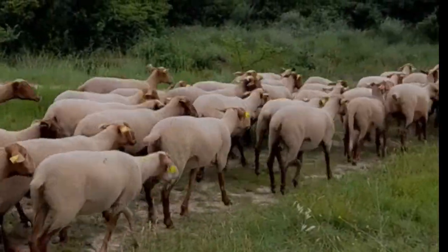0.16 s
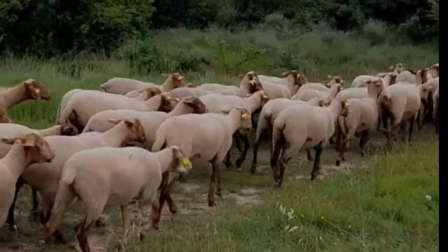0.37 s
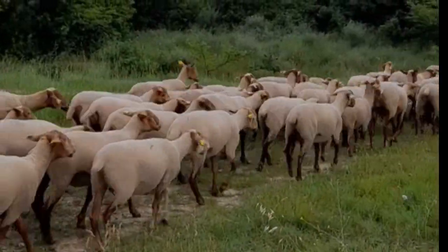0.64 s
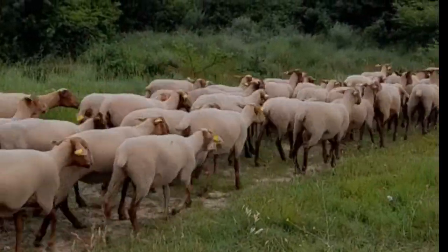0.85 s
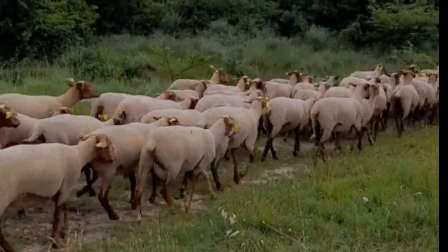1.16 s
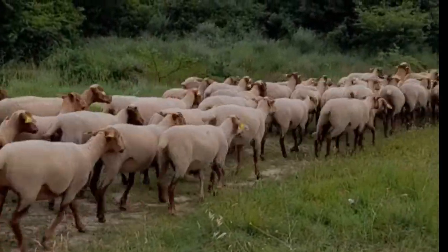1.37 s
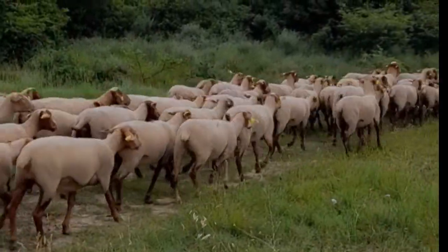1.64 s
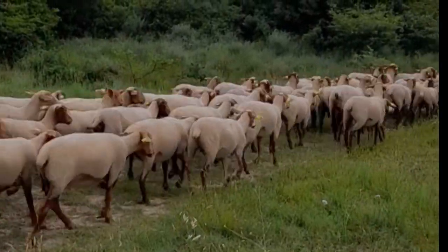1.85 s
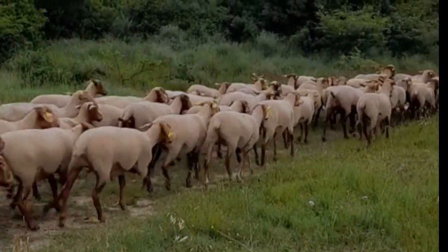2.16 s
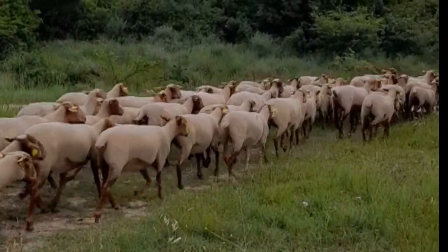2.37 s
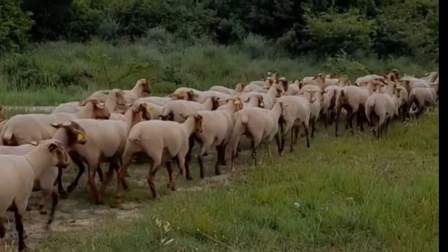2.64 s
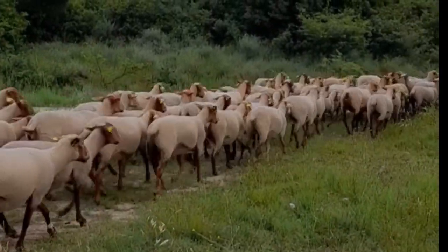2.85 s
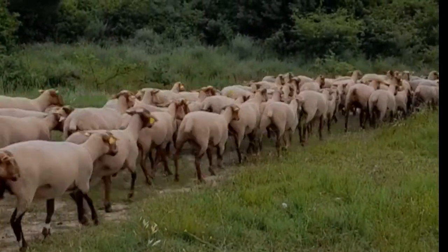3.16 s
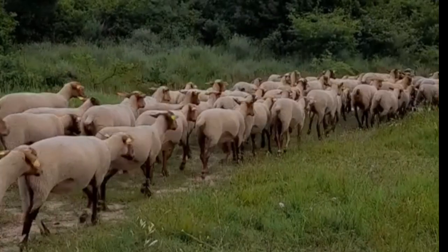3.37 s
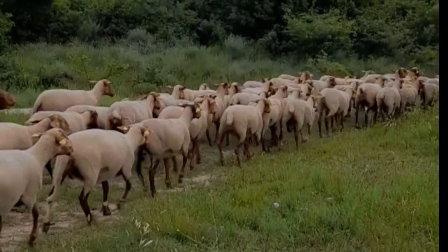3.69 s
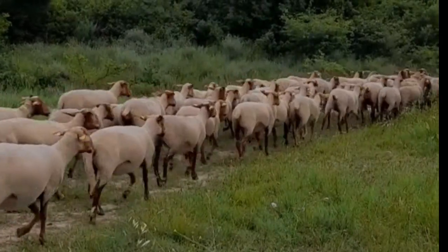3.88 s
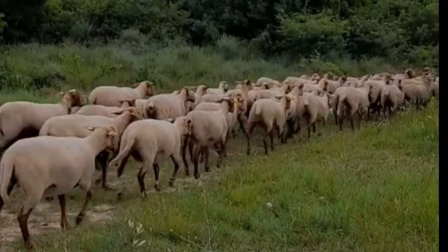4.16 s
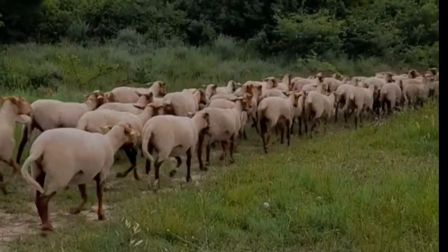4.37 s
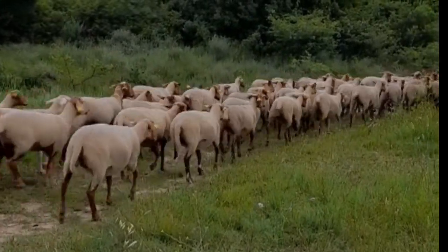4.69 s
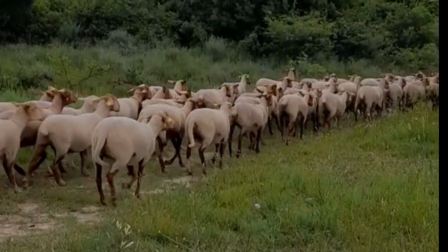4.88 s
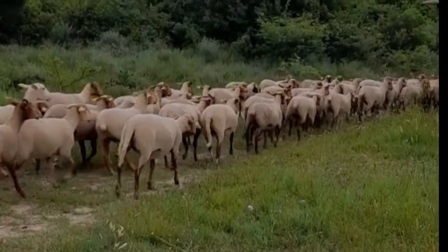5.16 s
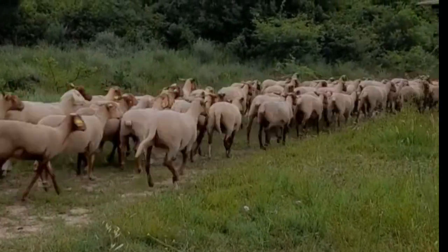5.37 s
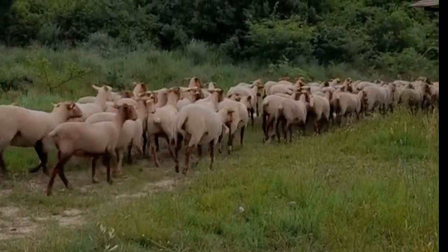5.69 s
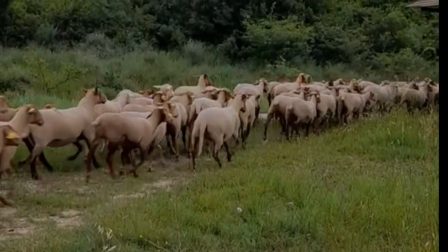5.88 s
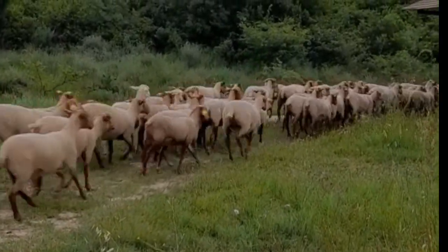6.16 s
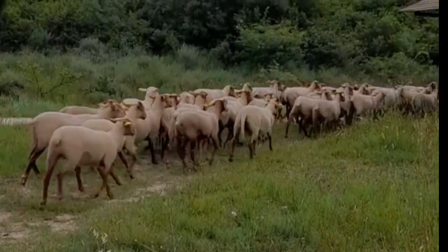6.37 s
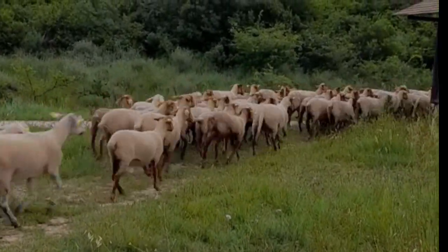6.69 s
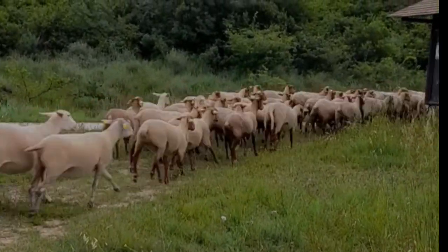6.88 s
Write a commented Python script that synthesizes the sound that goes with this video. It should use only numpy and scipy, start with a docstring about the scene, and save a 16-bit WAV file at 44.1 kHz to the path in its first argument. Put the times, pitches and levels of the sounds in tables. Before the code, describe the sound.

A flock of sheep tramples past on dry dirt and grass, hooves drumming and swishing, while a small tinny bell clanks irregularly and a bird trills faintly.

```python
"""A flock of sheep walks past on a dry dirt track between grass, its hooves drumming, scuffing and swishing
throughout as noise-filtered contacts. From 0.1 s a small sheet-metal bell clanks: decaying modes, struck by
a clapper; it nears, passes at about 3 s and leaves. Single hooves thud as damped sines and dry stalks snap
as noise bursts. From 0.9 s a bird trills in the hedge now and then, a swept sine.
The near drumming and the rustle are strongest after 5 s."""
import sys
import numpy as np
from scipy import signal
from scipy.fft import rfft, irfft, next_fast_len
from scipy.io import wavfile
from scipy.ndimage import map_coordinates

SR = 44100
rng = np.random.default_rng(int(sys.argv[2]) if len(sys.argv) > 2 else 0)


def to_wav(sig):
    """Store sig (one row per channel, or 1-D mono) as 16-bit WAV at the path in sys.argv[1].

    Samples outside -1..1 are clipped; the rate is SR.
    """
    pcm = np.clip(np.atleast_2d(sig), -1, 1) * 32767
    pcm = np.round(pcm).astype(np.int16)
    wavfile.write(sys.argv[1], SR, pcm.T)  # frames by channels


N = 310023


def amp(db):
    """dB to gain."""
    return 10 ** (np.asarray(db) / 20)


def unit(x):
    """Scaled to rms 1."""
    return x / np.sqrt(np.mean(x ** 2) + 1e-20)


def along(points, hz):
    """Interpolates (frequency [Hz], value) points on a log-frequency axis."""
    f, v = np.transpose(points)
    return np.interp(np.log(hz + 1), np.log(f + 1), v)


def wobble(knots_per_s):
    """A smooth random curve through normal knots."""
    knots = rng.standard_normal(int(N * knots_per_s / SR) + 4)
    return map_coordinates(knots, [np.arange(N) * knots_per_s / SR])


def filtered(x, response):
    """x times a response of frequency [Hz]."""
    m = next_fast_len(N + 8192)
    return irfft(rfft(x, m) * response(np.fft.rfftfreq(m, 1 / SR)), m)[..., :N]


def add(out, start_s, sound):
    """Mixes a sound into both channels from start_s."""
    part = out[:, round(start_s * SR):][:, :sound.shape[-1]]
    part += sound[..., :part.shape[1]]


# bird trills: (start [s], length [s], level [dB], lowest and highest pitch before droop and waver [Hz])
TRILLS = [(0.887, 0.14, -58, 3970, 5400), (2.328, 0.115, -53, 3940, 5030), (3.432, 0.15, -52, 3590, 4980),
          (5.033, 0.14, -50.5, 3480, 4770), (6.137, 0.17, -52.5, 3620, 4860),
          (6.829, 0.18, -55.5, 3590, 4830)]


def bird():
    """A thin whistle arches up and down 81 times a second, unevenly; the hedge blurs it."""
    out, uneven, waver = np.zeros((2, N)), wobble(70), wobble(60)
    for start_s, length_s, db, low_hz, high_hz in TRILLS:
        t = np.arange(round(length_s * SR)) / SR
        first = round(start_s * SR)
        here = slice(first, first + len(t))
        arch = np.sin(np.pi * 81 * t) ** 2
        loudness = (.2 + arch) * amp(3 * uneven[here])
        droop = 1 - 0.07 * (t / length_s) ** 3
        pitch_hz = (low_hz + (high_hz - low_hz) * arch) * droop * (1 + 0.02 * waver[here])
        fade = np.clip(t / 0.014, 0, 1) * np.clip((length_s - t) / 0.0051, 0, 1)
        whistle = np.sin(2 * np.pi * np.cumsum(pitch_hz) / SR)
        add(out, start_s, amp(db) * fade * loudness * whistle)
    t = np.arange(SR // 8) / SR
    leaves = rng.standard_normal((2, len(t))) * amp(-60 * t / .14)
    leaves /= np.linalg.norm(leaves[0])
    return out + 0.65 * signal.fftconvolve(out, leaves, axes=1)[:, :N]


# likeness of left and right in the trampling: (frequency [Hz], correlation [-1 to 1])
ALIKE = [(130, 1), (290, 0.98), (640, 0.88), (1400, 1), (3100, 0.41), (15000, -0.031)]


def trample(spectrum, contacts_per_s, spread_db, noise_rms):
    """Stereo rms 1: contacts of very unequal size over smooth noise, shaped by a spectrum."""
    chance, size = rng.random((2, 2, N))
    size_db = -spread_db * np.log(1 - size + .02)
    contacts = (chance < contacts_per_s / SR) * amp(size_db) * rng.standard_normal((2, N))
    pair = unit(contacts) + noise_rms * rng.standard_normal((2, N))
    low_end = [(1, -120), (spectrum[0][0] / 2, -90)]
    closed = low_end + list(spectrum) + [(spectrum[-1][0] * 2, -90)]

    def mid_side(hz):
        turn = np.arccos(np.clip(along(ALIKE, hz), -1, 1)) / 2
        return amp(along(closed, hz)) * [np.cos(turn), np.sin(turn)]

    mid, side = filtered(pair, mid_side)
    return unit(np.array([mid + side, mid - side]))


# spectra of the flock's layers: (frequency [Hz], relative density [dB per Hz])
DEEP_SPECTRUM = [(22, -38), (33, -14), (54, -1), (81, -7), (124, 3), (150, -6.5), (200, -16)]
NEAR_SPECTRUM = [(110, -46), (150, 1.5), (190, -1), (240, -4), (310, -32)]
HARD_SPECTRUM = [(190, -23), (250, -1.5), (300, -4), (400, -14.5), (550, -36)]
SCUFF_SPECTRUM = [(250, -34), (420, -1), (800, 1), (1100, -1.5), (1600, -7.5), (2400, -14.5), (4000, -6)]
GRASS_SPECTRUM = [(1500, -8), (2500, -7.5), (4000, -4), (6500, 0), (8500, -5), (9800, 1.5), (11600, -2),
                  (14000, 2.5), (15800, -5.5)]
# flock controls, used as deviations from their means:
# (time [s], deep drumming [dB], near drumming [dB], rustle [dB])
FLOCK = [(0.0, -50, -48.5, -61.5), (0.21, -53, -57, -60.5), (0.45, -51, -55.5, -65.5),
         (0.96, -54.5, -55.5, -64), (1.21, -54.5, -53.5, -61.5), (1.66, -53.5, -57, -61),
         (2.06, -54.5, -54.5, -61), (2.56, -51, -53.5, -60.5), (2.64, -50.5, -55, -58.5),
         (3.37, -51.5, -53, -58.5), (3.74, -52.5, -49, -59), (4.01, -50, -50.5, -58),
         (5.4, -50.5, -48, -55), (5.7, -50, -46, -52.5), (6.32, -49, -43, -56.5), (6.62, -54, -44, -55),
         (6.83, -50, -47, -59), (7.03, -51, -45, -59.5)]
# animals passing close in a bunch: (middle [s], half length [s],
# swell of drumming [dB], of knocks on hard soil [dB], of rustle [dB])
BUNCHES = [(0.17, 0.093, 14.5, 3, -3), (0.646, 0.055, 3, 2.5, 4), (1.975, 0.056, 3, 7, 2),
           (2.784, 0.023, 5.5, 1.5, -1), (3.008, 0.041, 5.5, 2.1, 7), (4.06, .06, 4, 3, 0),
           (4.27, 0.088, 0, 4, -2), (4.496, .05, 4, 4.3, -1.5), (4.72, 0.019, 1.5, 4.4, 3),
           (5.515, 0.045, -3, 9.3, -1.5), (5.943, 0.082, 1, 6.6, 2), (6.464, 0.03, 10, 6.3, 3.5),
           (6.768, 0.1, 6, 6, 4.5), (6.97, 0.022, 2, 6.6, 2)]


def flock():
    """Many hoof contacts blur into drumming, knocks, scuffing and swish; close bunches change their levels."""
    time_s, *columns = np.transpose(FLOCK)
    t = np.arange(N) / SR
    deep_db, drum_db, rustle_db = [np.interp(t, time_s, c) - np.mean(c) for c in columns]
    close_db, knock_db, brush_db = sum(
        np.outer(swell_db, np.exp(-((t - middle_s) / half_s) ** 2))
        for middle_s, half_s, *swell_db in BUNCHES)
    steps = wobble(9)  # shared by scuff and grass

    # each level: mean dB + slope * control
    deep_level = -49 + 1.26 * deep_db + 1.4 * wobble(6.17) + 0.41 * wobble(49)
    near_level = -52.5 + 0.71 * drum_db + close_db + 1.33 * wobble(10)
    hard_level = -58.5 + 1.04 * drum_db + knock_db + 0.98 * wobble(14)
    scuff_level = -58 + 0.55 * rustle_db + 0.21 * knock_db + 0.55 * brush_db + 0.64 * steps
    grass_level = -53.5 + 1.03 * rustle_db + brush_db + 1.9 * steps + 2.13 * wobble(30)

    deep = amp(deep_level) * trample(DEEP_SPECTRUM, 300, spread_db=1.5, noise_rms=1.4)
    near = amp(near_level) * trample(NEAR_SPECTRUM, 150, spread_db=2.5, noise_rms=1.45)
    hard = amp(hard_level) * trample(HARD_SPECTRUM, 150, spread_db=2.5, noise_rms=0.92)
    scuff = amp(scuff_level) * trample(SCUFF_SPECTRUM, 500, spread_db=4.0, noise_rms=1.58)
    grass = amp(grass_level) * trample(GRASS_SPECTRUM, 1500, spread_db=1.5, noise_rms=1.57)
    return deep + near + hard + scuff + grass


# single near hoof falls, each starting 3 ms before its time: (time [s], level [dB], pitch [Hz])
THUDS = [(0.066, -37, 173), (0.311, -47, 119), (0.884, -42.5, 123), (1.097, -45, 129), (1.347, -45, 150),
         (1.412, -39.5, 127), (1.609, -44, 125.8), (1.718, -40, 120), (1.819, -42, 126), (1.857, -42, 131),
         (1.958, -37.5, 145), (2.124, -42, 123), (2.575, -40, 127), (2.736, -48, 121), (2.943, -44.5, 125),
         (3.281, -40, 147), (3.502, -44, 95), (3.81, -41, 132), (3.883, -38, 138.5), (4.392, -49, 96),
         (4.696, -41, 122), (5.162, -34.5, 119), (5.454, -41, 135), (5.512, -36, 212), (5.92, -34, 257),
         (6.131, -36, 142), (6.389, -33.5, 282), (6.468, -38, 250), (6.554, -40, 133), (6.721, -35, 136),
         (6.952, -31.5, 187)]


def thuds():
    """A hoof pushes the soil once; it swings back for a cycle or two."""
    out, t = np.zeros((2, N)), np.arange(SR // 20) / SR
    for time_s, db, hz in THUDS:
        rise_s = 0.89 / hz
        envelope = (t / rise_s) * np.exp(1 - t / rise_s)
        add(out, time_s - .003, amp(db) * envelope * np.sin(2 * np.pi * hz * t))
    return out


# snapping stalks and pebbles: (time [s], level before filtering [dB],
# dull body relative to the crack, before filtering [dB], left-right [dB])
SNAPS = [(0.3383, -24, -28, -4), (1.1822, -47, -19, -2.5), (1.6906, -35, -21, -1.0),
         (1.8402, -43.5, 15.5, -4.5), (1.9854, -45, -23, -2.0), (2.0153, -49, -19, -1.5),
         (2.056, -21, -24, -1.5), (3.01, -21, -24, -1.0), (3.1188, -48, -20, 5), (3.3797, -44, -24, -0.5),
         (3.7244, -44, -22, -1.5), (3.7474, -19, -27, -0.5), (3.8591, -53, -11, -2),
         (4.0138, -41, -23, -1.0), (4.1234, -51, -16, -2.5), (4.142, -46, -22, -7),
         (4.6254, -27, -20, -2.0), (4.8788, -39, -21, -4), (5.0669, -46, -17, -1.5),
         (5.2777, -18, -13.5, -1.5), (5.4096, -44, -22, -5), (5.4605, -41, -21, -1.5),
         (5.7748, -44, -22, -2.0), (5.9004, -36, -15, -2.0), (5.9422, -16.5, -22, -16),
         (5.9468, -22, -29, -3), (5.9735, -27, -12, -1.5), (6.4526, -22, -21, 14), (6.5655, -41, -19, -1.5),
         (6.663, -27, -20, -2.0)]


def snaps():
    """A crack of about a millisecond, with a duller body and a short scatter of dust."""
    bright, dull, t = np.zeros((2, N)), np.zeros((2, N)), np.arange(SR // 30) / SR
    shape = amp(-60 * t / .004) + .12 * amp(-60 * t / .03)  # crack + dust
    for time_s, db, dull_db, pan_db in SNAPS:
        shared, own = rng.standard_normal(len(t)), rng.standard_normal((2, len(t)))
        crack = shape * (shared + .5 * own)
        side_db = db + np.array([[pan_db], [-pan_db]]) / 2
        crack = amp(side_db) * crack / np.abs(crack).max()
        add(bright, time_s, crack)
        add(dull, time_s, amp(dull_db) * crack)
    treble = lambda hz: (1j * hz / (5000 + 1j * hz)) ** 4
    body = lambda hz: 1j * hz * 3000 / (2500 ** 2 - hz * hz + 1j * hz * 3000)
    return filtered(bright, treble) + filtered(dull, body)


# places round the wall where the clapper lands:
# (response of each of the eight shell modes [dB] x 8, push on each of the five patches [dB] x 5)
PLACES = [(-14, -13, -30.0, -17.5, -13, -3.5, -8, -5, -37.0, -11, -23.0, 3.5, -17),
          (-15.5, -34, -49, -12, -34, -10, -18, -4.5, -1.5, -51, -37.0, -19, -20),
          (-7.5, -25, -11, -6.5, -18, -10, -6, -3, -32, -1.0, -23, -40.0, -8),
          (-4.0, -17, -19, -31, -5.5, -2, 4, 1.5, -18.0, -38, -8.5, -13, -44),
          (-13.5, -45, -24, -19.5, -23, -9.0, -28, -14.0, -7, -14, -36, -20, 0),
          (-21, -29.5, -25.0, -10, -3.5, -19, 2.5, -8, -30, -49, -6.0, -8, -45),
          (-9.5, -27, -24, -38, -13.5, 2, -23, -11, -40.0, 1, 4, -13, -23.0),
          (-7, -55, -11, -33.0, -3.5, -7, -40.0, -1, -4, -5.5, 4, -40.0, -40.0)]


def push(db, place, weight_db):
    """A blow between two places shares their patterns; a heavier one moves the four deepest modes more."""
    k, share = int(place // 1), place % 1
    here, beyond = amp(PLACES[k % len(PLACES)]), amp(PLACES[(k + 1) % len(PLACES)])
    pattern = (1 - share) * here + share * beyond
    is_deep = np.arange(len(pattern)) < 4
    return amp(db + weight_db * is_deep) * pattern


# the eight lowest modes, in which the whole shell bends: (frequency [Hz], free t60 [s])
SHELL = [(902, .68), (1933, .36), (2237, .5), (2767, .4), (3898, .33), (4159, .12), (5251, .14),
         (5459, .16)]
# the high modes: (frequency [Hz], free t60 [s], level for a blow on each of five wall patches [dB] x 5)
HIGH_MODES = [(6010, 0.11, -34, -40, -40, -19, -21), (6285, 0.12, -40, -3, -23, 0, -18),
              (6390, 0.13, 0, -14, -40, -40, -40), (6543, 0.18, -25, -29, -23, -31, -14),
              (6745, 0.16, -40, -23, 0, -40, -40), (7138, 0.14, -17, -5, -40, -11, 0),
              (7531, 0.12, -40, -3, -24, -7, -40), (7870, 0.08, -40, 0, -28, -11, -21),
              (8492, 0.1, -34, -40, -40, 0, -40), (8720, 0.1, -40, -6, -40, -16, -10),
              (9071, 0.1, -20, -6, -40, -40, -15), (9730, 0.1, -40, -40, -23, -28, -16),
              (10549, 0.1, -17, -26, -40, -38, -3), (10656, 0.1, -13, -40, -26, -15, -14),
              (10990, 0.1, -21, -17, -32, -17, -10), (11569, 0.1, -19, -40, -40, -10, -6),
              (12500, 0.1, -37, -12, -40, -40, -6), (12758, 0.1, -40, -25, -40, -26, 0),
              (12968, 0.1, -40, -22, -16, -40, -9), (13375, 0.1, -35, -22, -21, -14, -16),
              (13740, 0.1, -40, -40, -28, -38, -10), (14287, 0.1, -40, -13, -33, -40, -10)]
# air inside the bell and its collar, scaled by the lowest mode: (frequency [Hz], t60 [s], level [dB])
HOLLOW = [(765, 0.14, -8), (1059, 0.092, -4.5)]
# clapper blows: (time heard [s], strength [dB], place round the wall [0-8],
# weight added to the deep modes [dB], share of the free ringing time that the fleece leaves [ratio])
BLOWS = [(0.12, -56, 1.3, -10, 0.64), (0.39, -56, 6.8, -14, 0.57), (0.5709, -48.5, 4.6, 1, 1),
         (0.9419, -40.5, 3.77, -0.5, 0.87), (1.2048, -54, 0.83, 2, 0.9), (1.3604, -31, 4.83, 3.0, 0.97),
         (1.552, -37, 1.06, 5.5, 0.68), (1.6077, -57.0, 6.0, -15.0, 0.9), (1.642, -52.5, 5.4, 13, 0.9),
         (1.6797, -44, 3.45, -7, 0.6), (1.8745, -34.5, 1.06, -9.5, 0.75), (1.9266, -49.5, 1.3, -21.0, 0.9),
         (1.975, -53.5, 4.6, 6, 0.82), (2.2678, -35.5, 2.0, -9.0, 1), (2.4588, -41.5, 0.72, -4, 0.83),
         (2.6146, -38, 4.0, -0.5, 0.9), (2.932, -38, 4.47, 4, 1), (3.064, -57, 7.0, -3, 1),
         (3.2782, -39.5, 0.078, 6.5, 0.86), (3.493, -35, 0.8, -0.5, 1), (3.5789, -34.5, 7.33, -1, 0.98),
         (3.8843, -43, 7.55, 4, 0.82), (4.1925, -42.5, 6.0, 2.5, 0.88), (4.404, -44, 3.61, 5.5, 0.9),
         (4.5816, -56, 6.2, 2, 0.9), (4.6524, -41.5, 5.4, 2.5, 1), (4.8155, -53, 6.5, -8, 1),
         (4.9065, -50, 4.1, 3, 0.7), (4.9633, -38.5, 5.32, -1, 0.85), (5.2143, -46.5, 2.3, -21.0, 0.8),
         (5.245, -49.5, 5.6, 5, 0.94), (5.4696, -44, 2.8, 1.5, 0.79), (5.74, -42.5, 2.57, -8.5, 0.75),
         (6.0098, -42, 2.7, -10, 0.75), (6.205, -52.0, 0.98, -6, 0.9), (6.284, -57.5, 7.0, -3, 0.9),
         (6.311, -56.5, 2.8, 9, 1), (6.4533, -46.5, 3.73, 5, 0.55), (6.529, -51.5, 2.5, -24, 0.61),
         (6.697, -47.5, 4.0, 2, 0.84), (6.7983, -47.5, 7.1, -1.5, 0.93)]
# the bell nears, passes and leaves: (time [s], speed towards the listener [m/s])
APPROACH = [(0, .86), (1.9, .86), (3.2, 0), (4.3, -.5), (5.3, -1.2), (7, -1.2)]


def bell():
    """Blows ring the shell and wall patches, the loose clapper chatters, and the passing bends the pitch."""
    sway_peak_db, sway_hz, sound_m_per_s = 2, 9, 343
    out, t = np.zeros((2, N + SR // 10)), np.arange(SR // 2) / SR
    hz, t60_s = np.transpose(list(SHELL) + [mode[:2] for mode in HIGH_MODES])
    patch_gain = amp(np.array(HIGH_MODES)[:, 2:])
    onset = 1 - np.exp(-t / 0.00066)
    ringing = amp(-60 * t / t60_s[:, None]) * onset * np.exp(2j * np.pi * hz[:, None] * t)
    knock = sum(amp(db - 60 * t / life_s) * np.sin(2 * np.pi * f * t) for f, life_s, db in HOLLOW)
    # high modes have small patterns, which react most to chances of position
    fickle = np.clip(hz / 6000, 0, 1)
    # sound sent on approach arrives squeezed, on leaving stretched
    heard_s = np.arange(N) / SR
    speed = np.interp(heard_s, *np.transpose(APPROACH))
    sent_s = np.cumsum(1 + speed / sound_m_per_s) / SR
    coarse_t = t[::64]
    short = t[:SR // 6]
    clack_decay = amp(-60 * short / 0.029) + 0.43 * amp(-60 * short / 0.23)

    for time_s, *blow, free in BLOWS:
        # each mode swells and sinks as the bell swings, at 0.5-1.5 times sway_hz
        phase, pace = rng.uniform(size=(2, len(hz), 1))
        sway_db = sway_peak_db * np.sin(2 * np.pi * (phase + sway_hz * (.5 + pace) * coarse_t))
        fleece_db = -60 * coarse_t / t60_s[:, None] * (1 / np.clip(free, .2, 2) - 1)
        modes = np.repeat(amp(sway_db + fleece_db), 64, axis=1)[:, :len(t)] * ringing

        low, patches = np.split(push(*blow), [len(SHELL)])
        size = amp(2.0) * np.r_[low, patch_gain @ patches]
        chance = rng.standard_normal((9, len(hz)))
        # each mode beams differently to left and right, in level and phase
        turn = .68 * np.sign(chance[1]) + .35 * fickle * chance[2]
        beam = np.exp(np.outer([1, -1], .15 * fickle * chance[0] + 1j * turn))
        start_phase = np.exp(2j * np.pi * rng.random(len(hz)))
        ring = (size * beam * start_phase @ modes).imag + low[0] * knock

        # light rebounds feed some modes and choke others
        for k, late_s in enumerate(np.cumsum(rng.uniform(.005, .022, size=3))):
            kick = chance[3 + 2 * k] + 1j * chance[4 + 2 * k]
            again = 0.29 * 0.75 ** k * fickle * size * beam * kick
            add(ring, late_s, (again @ modes[:, :SR // 4]).imag)

        # contact clack of the quickly damped modes, relatively louder for a harder blow
        noise = signal.lfilter([1, 0, -1], [1], rng.standard_normal((2, len(short))))
        clack_gain = 0.79 * np.linalg.norm(size[len(SHELL):]) ** 1.274
        add(ring, 0, clack_gain * noise * clack_decay)
        add(out, np.interp(time_s, heard_s, sent_s), ring)
    return np.array([map_coordinates(side, [sent_s * SR]) for side in out])


# stereo lean of the drumming, rustle and thuds: (frequency [Hz], left-right [dB])
LEAN = [(60, -1.45), (400, -1.5), (4000, -2.5), (15000, -0.5)]


def scene():
    """All layers; flock and thuds are a little louder and 0.1 ms earlier on the right."""
    def lean(hz):
        half_gain = np.log(amp(along(LEAN, hz))) / 2
        half_delay = -1j * np.pi * hz * .0001
        return np.exp(np.outer([1, -1], half_gain + half_delay))

    ground = filtered(flock() + thuds(), lean)
    return bird() + ground + snaps() + bell()


def record(dry):
    """Band limit: nothing passes from 15.9 kHz up."""
    return filtered(dry, lambda hz: hz < 15900)


dry = scene()
out = record(dry)
to_wav(out)
```